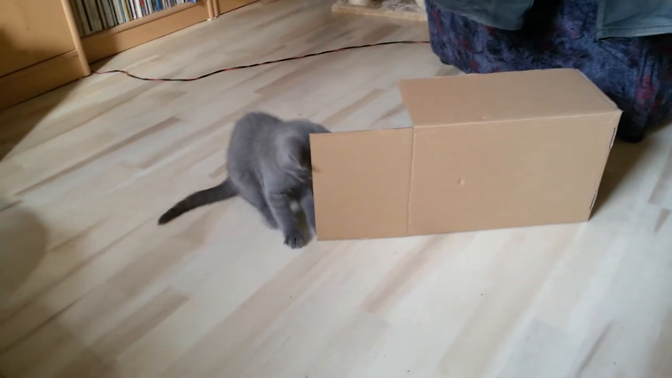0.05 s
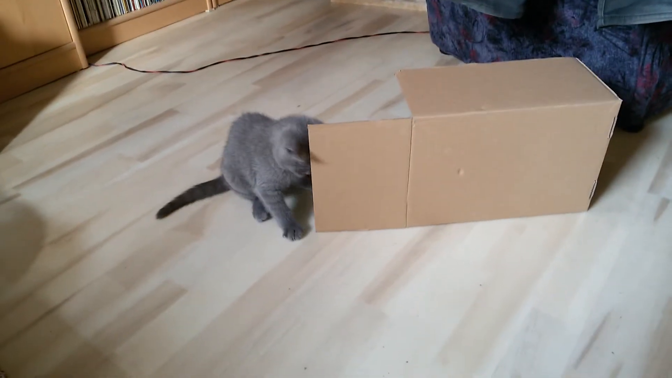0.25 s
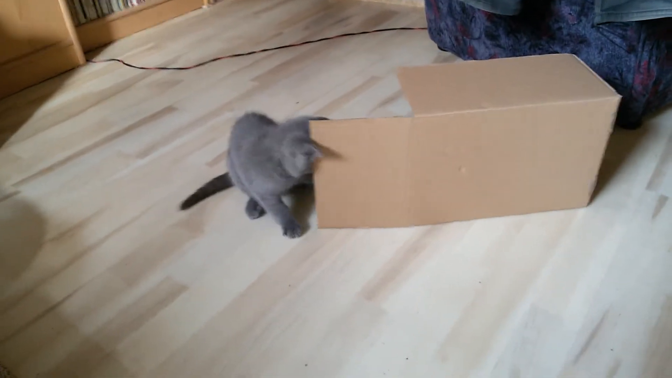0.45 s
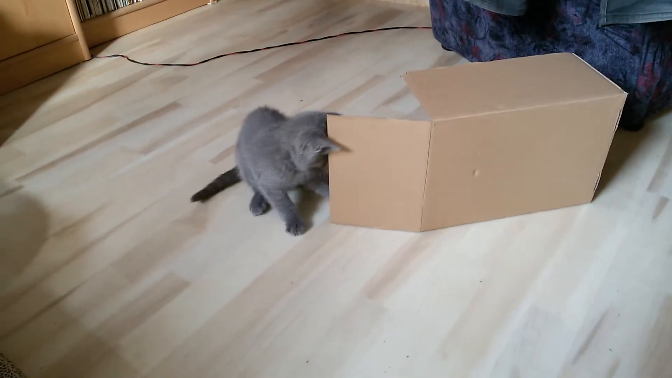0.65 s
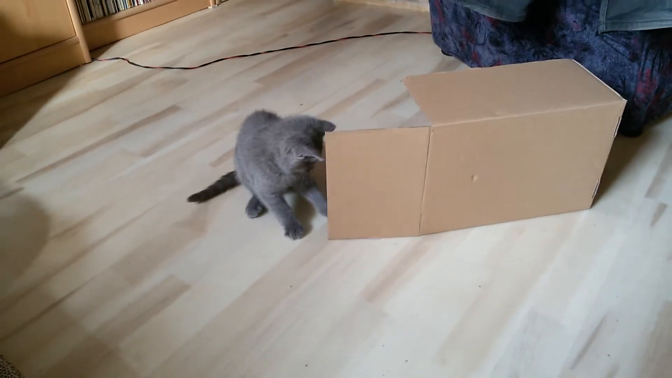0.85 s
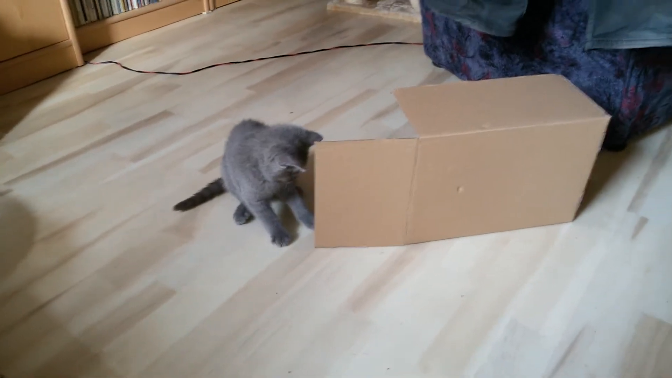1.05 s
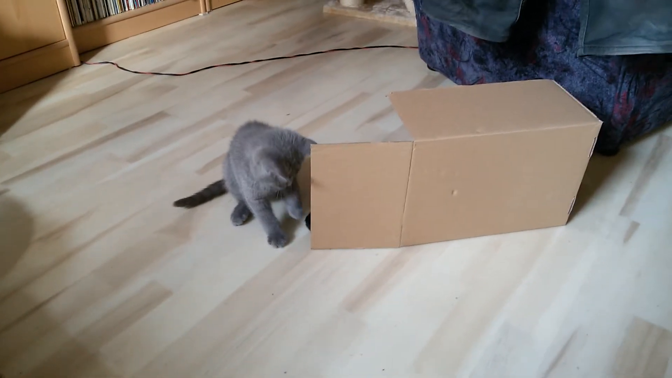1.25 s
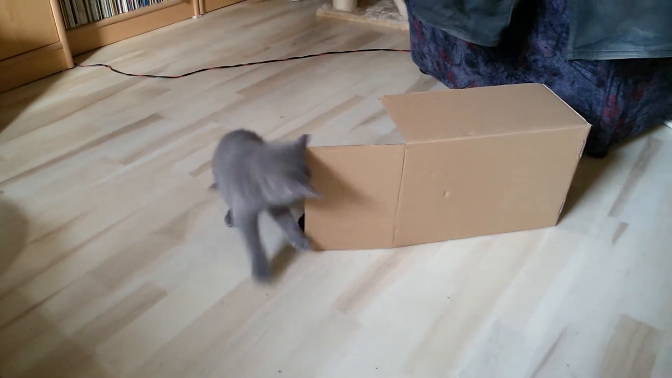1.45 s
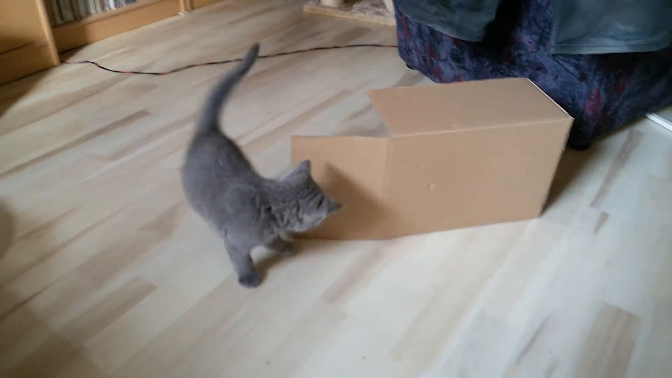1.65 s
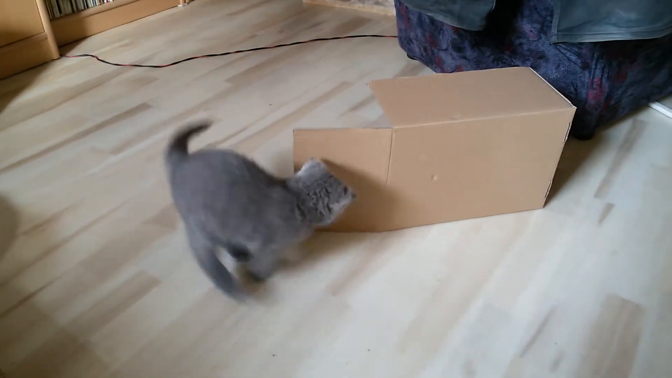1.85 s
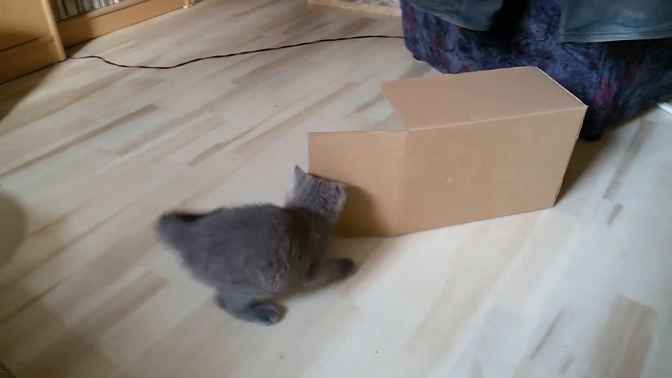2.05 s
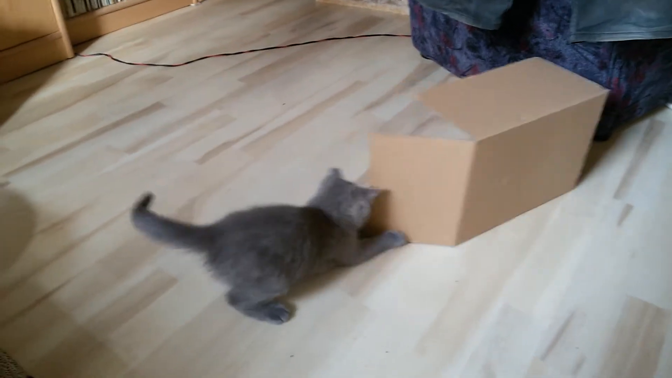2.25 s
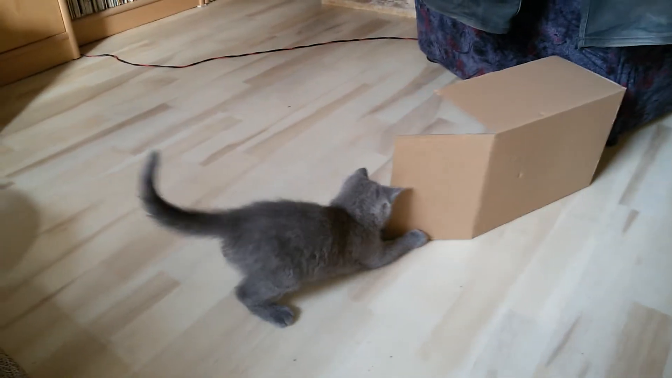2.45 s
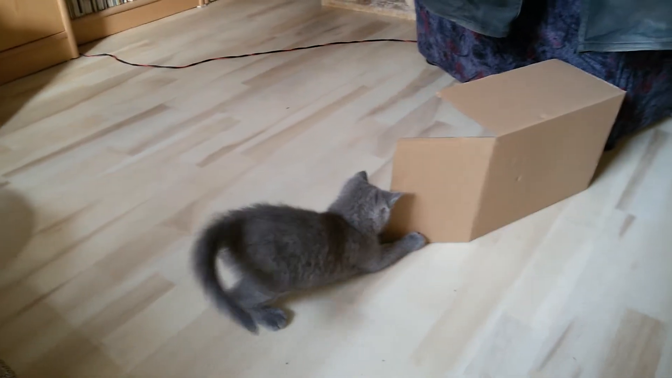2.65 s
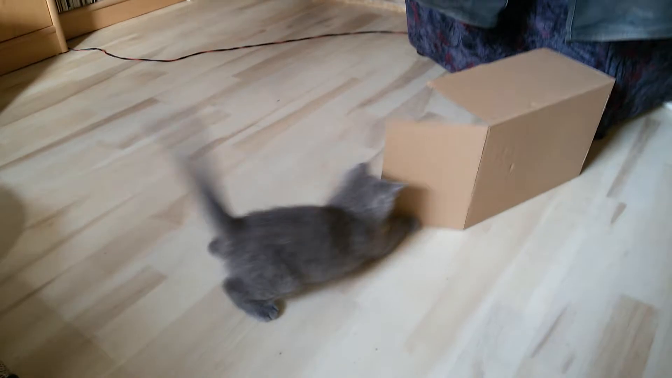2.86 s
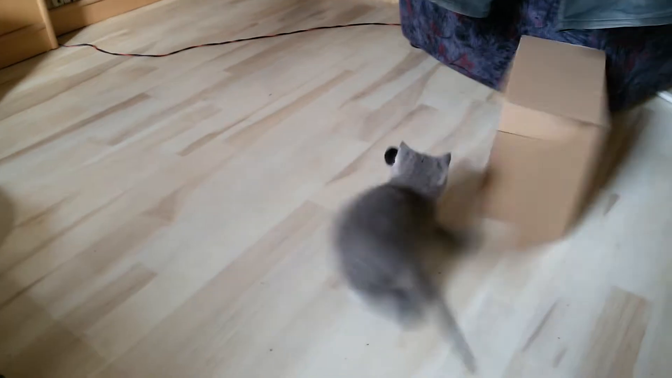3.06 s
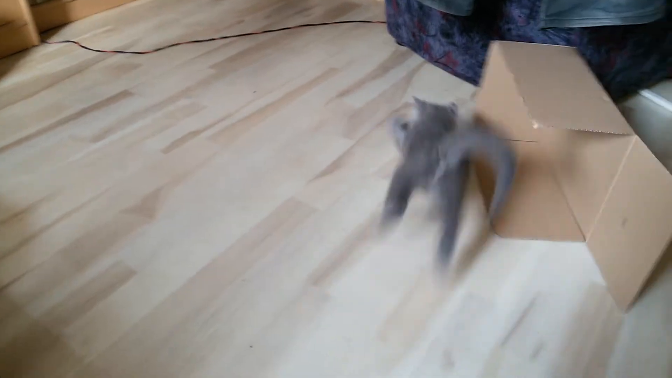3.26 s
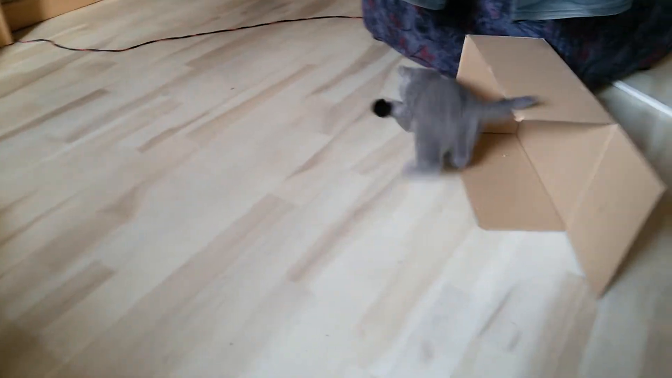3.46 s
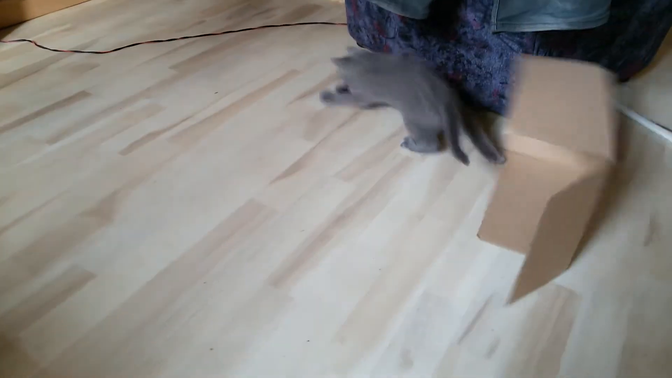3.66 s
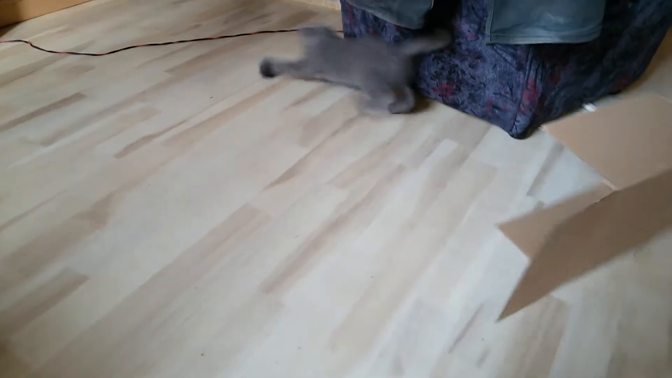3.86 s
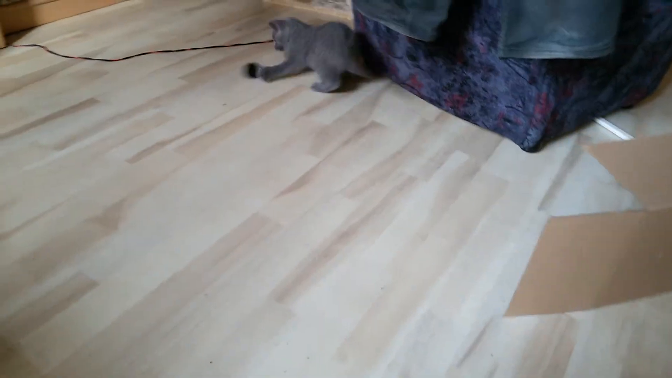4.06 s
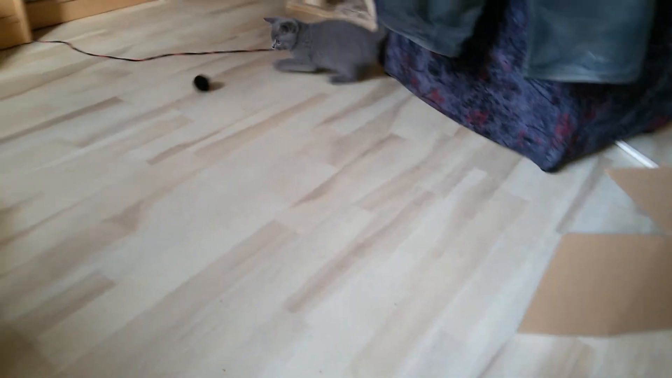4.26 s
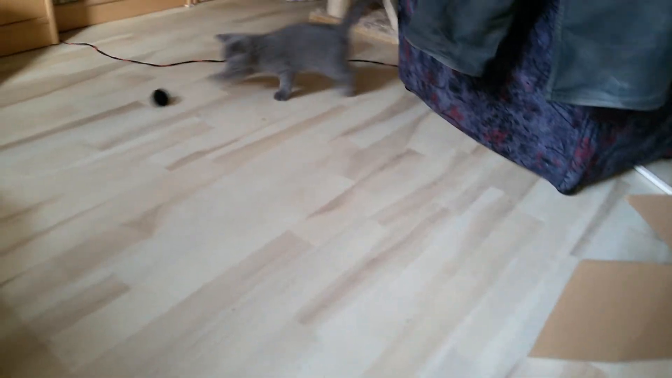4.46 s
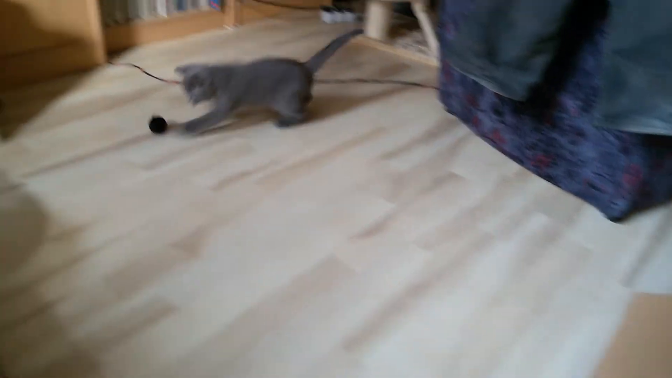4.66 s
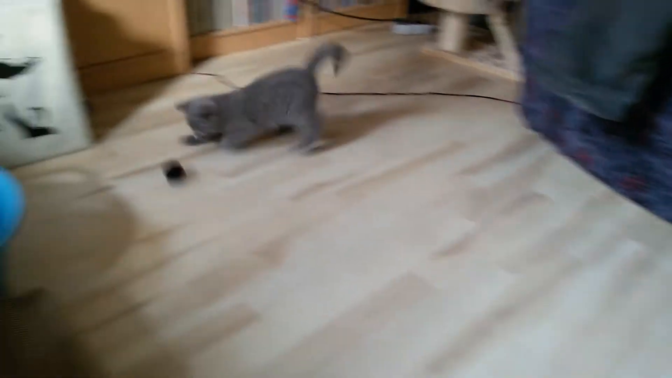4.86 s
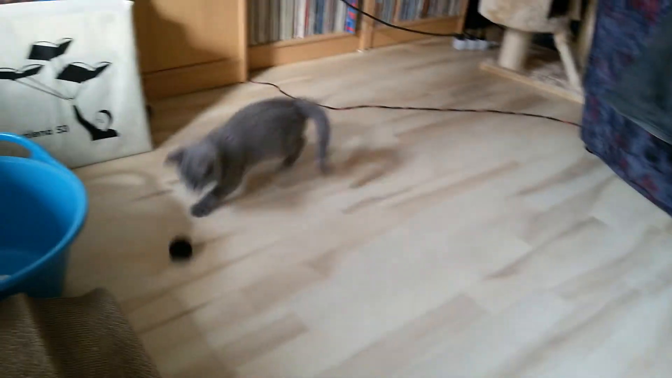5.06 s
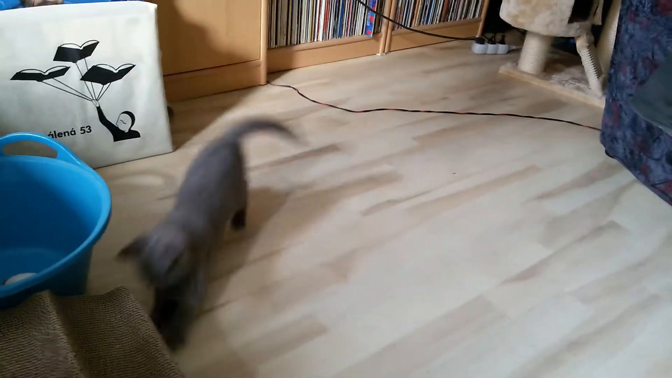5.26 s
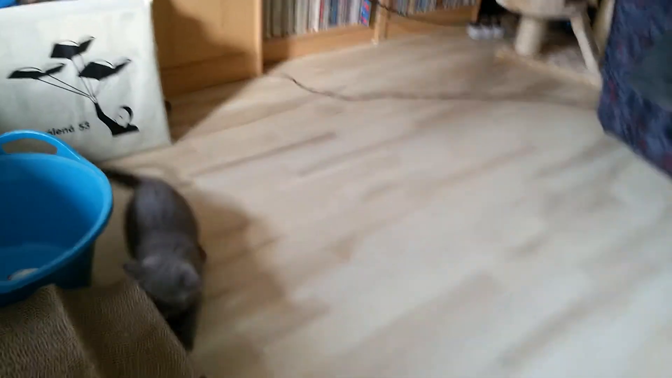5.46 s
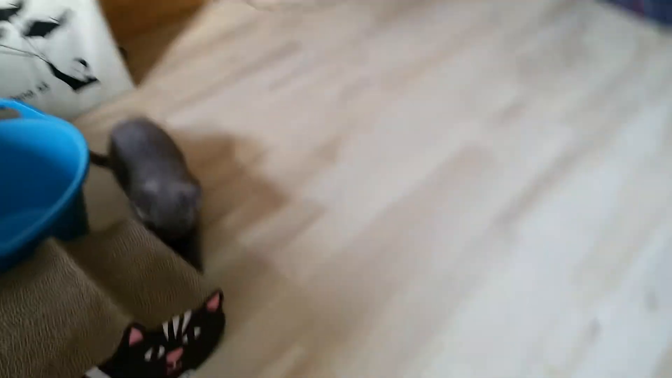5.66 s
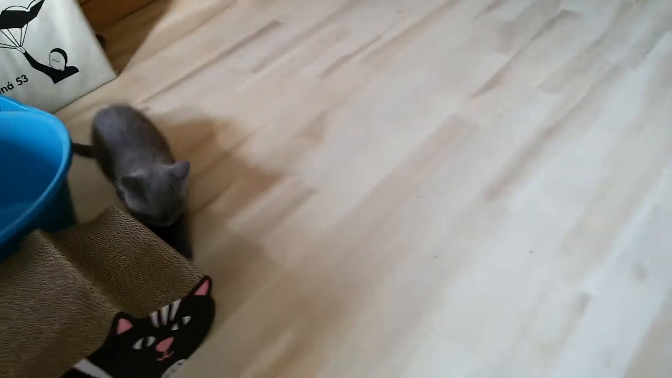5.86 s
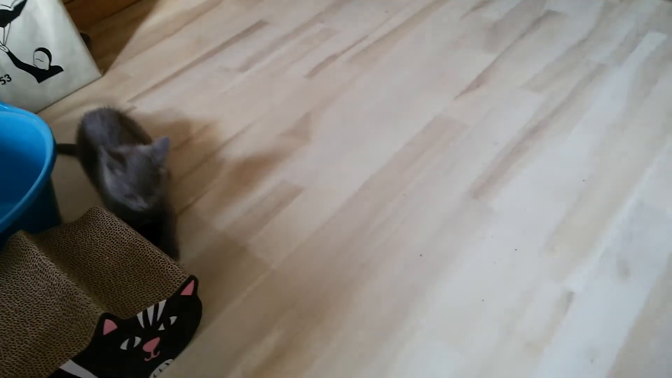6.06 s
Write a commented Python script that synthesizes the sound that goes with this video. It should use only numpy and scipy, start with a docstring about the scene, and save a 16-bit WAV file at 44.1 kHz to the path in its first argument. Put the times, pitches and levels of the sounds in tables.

```python
"""Paws and claws bat, shove and topple an empty cardboard box on a laminate floor; then a kitten chases a small toy.
Blows ring damped modes of the box panels and thin walls; claws tick as band-passed spikes with a scuff.
Edges and paws scrape as patchy noise with grit; unsteady noise drives the panels, boom and floor boards.
A furnished room answers with short echoes and a noise tail, over the soft hiss of a hand-held camera
and, faintly, a brief soft tone and a thin high ring."""
import sys
import numpy as np
from scipy import signal
from scipy.fft import rfft, irfft, next_fast_len
from scipy.io import wavfile
from scipy.ndimage import uniform_filter1d, map_coordinates

SR = 44100
rng = np.random.default_rng(int(sys.argv[2]) if len(sys.argv) > 2 else 0)


def to_wav(sig):
    """Store sig (one row per channel, or 1-D mono) as 16-bit WAV at the path in sys.argv[1].

    Samples outside -1..1 are clipped; the rate is SR.
    """
    pcm = np.clip(np.atleast_2d(sig), -1, 1) * 32767
    pcm = np.round(pcm).astype(np.int16)
    wavfile.write(sys.argv[1], SR, pcm.T)  # frames by channels


N = 269892

# Levels are those ahead of the microphone; spectrum and mode levels are relative.
# Background hiss spectrum: [f/Hz, level/dB]
HISS_SPECTRUM = [(12, -29), (20, -9.5), (30, 4), (97, -0.5), (640, -13.5), (1010, -16.5), (1450, -17.5),
                 (1760, -18.5), (1970, -20), (14800, -25)]
HISS_DB = -67.5  # rms
# Faint soft tone as the flap is brushed, before its wobble: [t/s, f/Hz, level/dB]
SOFT_TONE = [(1.55, 648, -71), (1.58, 644, -66), (1.60, 610, -64), (1.65, 595, -56.5), (1.70, 590, -92)]
# Thin high ring: [t/s, level/dB]
HIGH_RING = [(4.55, -90.5), (4.9, -80), (5.15, -79.5)]
HIGH_RING_HZ = 9430

# Decay of the furnished room: [f/Hz, t60/s]
ROOM_DECAY = [(100, 0.4), (500, 0.34), (2000, 0.37), (6000, 0.38), (14000, 0.66)]
# Strength of the room's answer: [f/Hz, level/dB]
ROOM_STRENGTH = [(60, -5.5), (130, -9.5), (250, -4), (1000, -2.5), (5000, -1), (14000, -3.5)]
# Echoes off floor, box and sofa: [delay/ms, level/dB]
FIRST_ECHOES = [(1.9, -12), (4.6, -12.5), (8.3, -13), (13, -18)]

# Box panels, three of the body then two of the flap: [f/Hz, level/dB, t60/s undamped]
PANEL_MODES = [(181.3, 0.5, 0.42), (334, -7, 0.55), (395.4, -17.5, 0.24), (203.8, 2.5, 0.28),
               (281.6, -6, 0.89)]
# Thin box walls: [f/Hz, level/dB, t60/s undamped]
WALL_MODES = [(523, -9.5, 0.11), (588, -1.5, 0.09), (654, -12.5, 0.057), (728, -5, 0.032), (971, 1, 0.056),
              (1063, 1, 0.061), (1215, -2.5, 0.073), (1288, -2, 0.074), (1420, -10.5, 0.061),
              (1644, -2, 0.055), (1770, -4, 0.064), (1864, 1, 0.067), (2030, -12, .06), (2700, -4.5, 0.034)]
# Largest panel and the air in the box: [f/Hz, level/dB, t60/s undamped]
BOOM_MODES = [(75, -12, 0.26), (111.16, 2, 0.8), (129, -13, 0.17)]

# Spectrum of the floor scrape: [f/Hz, level/dB]
SCRAPE_SPECTRUM = [(700, -29.5), (1300, 3), (2000, 6), (2900, 4.5), (4000, 6.5), (5500, 2.5), (7500, -10.5),
                   (11000, -38.5)]
# Spectrum of the fine sliding hiss: [f/Hz, level/dB]
FINE_SPECTRUM = [(4500, -29.5), (6500, 2.5), (9000, 6.5), (12000, 1), (14600, -3.5)]
# Spectrum of the floor-board rumble: [f/Hz, level/dB]
BOARD_SPECTRUM = [(45, -8.5), (90, -2), (250, -1), (500, -12), (900, -28)]
# Strokes of paws and box edges: [start t/s, rise/s, hold/s, scrape level/dB,
# cardboard rasp level/dB and fine hiss level/dB, both relative to the scrape]
SLIDE_STROKES = [(0, 0.0013, 0.0014, -34.5, -7.5, -7.5), (0.048, 0.0057, 0.14, -63, -5.5, -22),
                 (0.338, 0.067, 0.11, -67.5, -4, -4), (0.598, 0.017, 0.018, -63, -5, -3.5),
                 (.68, 0.012, 0.008, -62, -10, -1), (0.729, 0.0035, 0.11, -61.5, -7, -7.5),
                 (1.078, 0.021, 0.018, -71.5, -19, -9), (1.422, 0.15, 0.055, -71, 0.5, -2.5),
                 (1.892, 0.0076, 0.14, -70.5, 4, -1.5), (2.007, 0.0045, 0.081, -53.5, -10.5, -6),
                 (2.168, 0.084, 0.044, -46.5, -3.5, -3), (2.297, 0.014, 0.13, -51, -3, -9.5),
                 (2.764, 0.095, 0.12, -60, 3, -7.5), (3.005, 0.04, 0.038, -43.5, -6, -9),
                 (3.143, 0.0036, 0.021, -45, -6.5, -9.5), (3.205, 0.02, 0.016, -45, -9.5, -12.5),
                 (3.24, 0.0094, 0.012, -46, -13.5, -13), (3.312, 0.0035, 0.011, -46, -8, -8),
                 (3.345, 0.023, 0.15, -47, -8.5, -9.5), (3.602, .005, 0.061, -50, 2, -6.5),
                 (3.599, 0.11, 0.059, -36, -5, -5.5), (3.761, 0.013, 0.038, -38, -1.5, -6),
                 (3.842, 0.015, 0.085, -40.5, -3, -9.5), (3.944, 0.012, 0.03, -40.5, -7, -14),
                 (4.0, 0.016, 0.073, -46.5, -3, -6.5), (4.162, 0.0112, 0.079, -55.5, -12.5, -9),
                 (4.289, 0.03, 0.15, -63, -2, -4), (4.52, 0.016, 0.036, -63.5, -6.5, -5.5),
                 (4.738, 0.026, 0.035, -63, -8, -12), (4.812, 0.0054, 0.034, -46, -15, -3),
                 (4.9, 0.032, 0.025, -57.5, -6, 2.5), (5.021, 0.0044, 0.052, -55.5, -6, -11),
                 (5.271, 0.0068, 0.04, -55.5, -5.5, -2.5), (5.309, 0.025, 0.093, -52, -10.5, -12.5),
                 (5.395, 0.02, 0.026, -56, -1.5, -7), (5.53, 0.0146, 0.026, -66, -4.5, -7.5)]
RISE_DB, FADE_DB_PER_S = 14.5, 147.5  # growth from start to hold; fade as the contact lifts
DRUM_DB, BOOM_DB, BOARDS_DB = -4.5, -17, -0.5  # drumming, boom and floor rumble relative to the rasp
BOX_LEFT_S = 5.3  # the kitten runs off: sliding no longer drums or booms the box
# The flap's edge sings as the kitten rubs it: [middle t/s, half-length/s, level/dB]
FLAP_SQUEAKS = [(0.123, 0.034, -56), (0.181, 0.013, -56.5), (0.51, 0.042, -71)]

# Claw and edge ticks: [t/s, snap peak level/dB, centre f/Hz, skid level/dB against the noise burst,
# bright edge level/dB of the unfiltered burst]
CLAW_TICKS = [(0.0783, -33, 1680, -2, -30), (0.0825, -29, 2500, -12, -14), (0.1217, -30.5, 1960, -14, -24),
              (0.172, -45, 1920, -11, -27), (0.6246, -44, 1690, 6, -12), (0.7326, -33, 2130, -2.5, -21.5),
              (2.0121, -35, 4200, -14, -25.5), (2.0695, -36.5, 3400, 0, -32.5),
              (2.2277, -14, 2020, -13, -29), (2.2297, -13, 1920, -6.5, -32), (3.032, -36, 4150, -7, -30),
              (3.1469, -28, 3540, -17, -20.5), (3.175, -50, 1510, -15, -28), (3.213, -35, 1950, -8, -28),
              (3.2475, -44, 1830, -11.5, -30), (3.250, -28.5, 5300, -11, -24.5),
              (3.3155, -35.5, 1900, -4, -29), (3.3648, -23.5, 4000, -14, -21), (3.369, -31, 3500, -13, -25),
              (3.4315, -13.5, 1335, -2.5, -24.5), (3.4329, -10.5, 3120, -1, -15.5),
              (3.4358, -13, 1100, -17, -36), (3.604, -28, 4360, -10, -24), (3.7789, -17, 1690, -16, -12),
              (3.7929, -22, 1690, -7.5, -21.5), (3.8653, -36, 2480, -21.5, -18.5),
              (3.9575, -20, 3860, -8, -30.5), (3.9635, -15.5, 3600, -28, -27),
              (4.013, -22.5, 4040, -16, -31), (4.059, -27.5, 7080, -16, -17), (4.3025, -39, 1410, -9, -25),
              (4.803, -48, 2260, -8, -32.5), (4.8168, -25, 3560, -3.5, -16.5),
              (4.826, -30.5, 3480, -3, -24.5), (4.852, -42, 3500, -7, -20), (4.931, -36, 3820, -18, -25.5),
              (4.9572, -31.5, 4500, -8, -24), (5.0242, -39.5, 3040, -1, -14), (5.0615, -38, 3700, -9, -22),
              (5.078, -41.5, 1505, -5, -20), (5.2756, -41, 2476, -11, -26), (5.305, -40, 3180, -11, -21.5),
              (5.3165, -35, 2970, -9, -23), (5.3382, -30, 3130, -23, -23.5),
              (5.3500, -36.5, 1300, -11.5, -21.5), (5.3516, -31.5, 3030, -17.5, -27.5),
              (5.4435, -40, 2440, -15, -18)]
TICK_RING = 0.47  # starting amplitude of the ring against the snap's peak

# Blows on box and floor: [t/s, thud level/dB, boom level/dB, slap level/dB, hardness f/Hz,
# swell/ms (before a small minimum is added), ring length (1 = undamped), flap share 0-1]
BLOWS = [(0.001, -68, -72, -40, 2250, 1.7, 0.8, 0.3), (1.461, -51.5, -75, -73, 694, 5.1, 0.6, 0),
         (1.564, -55.5, -81, -58, 900, 6.9, 0.8, 0.9), (1.903, -22.5, -38, -35.5, 486, 5.3, 0.58, 0.6),
         (2.019, -38, -40.5, -52, 900, 1.5, 0.45, 0.26), (2.2277, -16.5, -26, -27, 1600, 4.1, 0.6, 0.3),
         (2.231, -26, -36, -21.5, 620, 1.9, 0.56, 0.3), (2.852, -53, -70, -41.5, 1100, 14, 1, 0.2),
         (2.877, -37.5, -62, -41, 700, 0.92, 0.37, 0.6), (3.029, -58, -70, -39.5, 1100, 12, 1, 0.41),
         (3.058, -50.5, -59.5, -43.5, 620, 2.4, 1, 0.9), (3.076, -21.5, -48, -49, 593, 14, 0.4, 0.86),
         (3.1467, -26.5, -31.5, -44, 500, 0.66, 0.29, 0.1), (3.278, -35, -44.5, -57.5, 718, 2.2, 0.6, 0.3),
         (3.431, -16, -18.5, -19.5, 1140, 1.17, 0.92, 0.1), (3.472, -20, -21.5, -32, 990, 3.9, 0.6, 0.05),
         (3.750, -16, -24, -33.5, 620, 1.5, 0.47, 0.2), (3.790, -21, -28, -45, 900, 12, 0.68, 0.38),
         (3.845, -22, -22.5, -43, 900, 24, 0.82, 0.12), (4.08, -24, -49, -54.5, 700, 11, 0.41, 1),
         (4.264, -39.5, -64, -47, 600, 12, 0.9, 0.68), (4.302, -13, -25, -21.5, 580, 2.6, 0.49, 0.7),
         (4.812, -53, -70, -46, 937, 1.5, 0.37, 0.1), (5.411, -55.5, -55, -41, 480, 6.6, 0.76, 0.52),
         (5.462, -47, -54, -39.5, 400, 8, 0.69, 0.51)]
SLAP_SOFTNESS = 0.4  # exponent on the swell: a slap rises like the thud, only faster

# The camera's band limit
TOP_HZ = 14750


def amp(db):
    """Gain of a dB value."""
    return 10 ** (np.asarray(db) / 20)


def unit(x):
    """Scaled to rms 1."""
    return x / np.sqrt(np.mean(x ** 2) + 1e-20)


def along(points, hz):
    """Value at hz, interpolated between (Hz, value) points on a log axis."""
    f, v = np.transpose(points)
    return np.interp(np.log(hz + 1), np.log(f + 1), v)


def wobble(rate):
    """A smooth random curve, rate knots a second."""
    return map_coordinates(rng.standard_normal(int(N * rate / SR) + 4), [np.arange(N) * rate / SR])


def filtered(x, response):
    """x shaped by a complex response of frequency."""
    m = next_fast_len(N + SR // 2)
    return irfft(rfft(x, m) * response(np.fft.rfftfreq(m, 1 / SR)), m)[:N]


def shaped(x, spectrum):
    """x shaped by a table of levels over frequency."""
    return filtered(x, lambda f: amp(along(spectrum, f)))


def resonances(modes, wider):
    """Causal response of modes with alternating sign, each widened by a factor."""
    def response(f):
        total = 0
        for k, (centre, db, t60) in enumerate(modes):
            width = 1j * f * wider / t60
            total = total + (-1) ** k * amp(db) * width / (centre * centre - f * f + width)
        return total
    return response


def patchy(patchy_db):
    """White noise with random patches of gain in time and frequency."""
    z = signal.stft(rng.standard_normal(N), nperseg=256)[2]
    field = uniform_filter1d(rng.standard_normal(z.shape), size=6, axis=0)
    field = uniform_filter1d(field, size=8, axis=1)
    return signal.istft(z * amp(patchy_db * unit(field)), nperseg=256)[1][:N]


def hiss():
    """The quiet room and the microphone's own noise: slightly patchy, shaped noise."""
    return amp(HISS_DB) * unit(shaped(patchy(patchy_db=-0.24), HISS_SPECTRUM))


def soft_tone():
    """A short, hoarse low sine, unsteady in level and pitch as the flap is brushed."""
    s, hz, db = np.transpose(SOFT_TONE)
    t = np.arange(N) / SR
    level = amp(np.interp(t, s, db, -120, -120) + 3.0 * wobble(70))
    pitch = np.interp(t, s, hz) * (1 + 0.02 * wobble(60))
    return level * np.sin(2 * np.pi * np.cumsum(pitch) / SR)


def high_ring():
    """A thin, unsteady high ring: noise in a very narrow band."""
    t = np.arange(N) / SR
    narrow = filtered(rng.standard_normal(N), lambda f: np.exp(-((f - HIGH_RING_HZ) / 45) ** 2))
    return amp(np.interp(t, *np.transpose(HIGH_RING), -120, -120)) * unit(narrow)


def room(x):
    """Noise tail of the room, each frequency dying at its own speed; new every third of a second."""
    out, step = np.zeros(N + 2 * SR), SR // 3
    for start in range(0, N, step):
        hz, t, z = signal.stft(rng.standard_normal(SR * 3 // 5), SR, nperseg=256)
        decay = amp(-60 * t / along(ROOM_DECAY, hz)[:, None])
        tail = signal.istft(z * decay, SR, nperseg=256)[1]
        wet = signal.fftconvolve(x[start:start + step], tail / np.linalg.norm(tail))
        out[start + 130:][:len(wet)] += wet  # about 3 ms behind the direct sound
    return out[:N]


def echoes(x):
    """The direct sound and its delayed, weaker first reflections."""
    reflected = sum(amp(db) * np.pad(x, (round(ms * SR / 1000), 0))[:N] for ms, db in FIRST_ECHOES)
    return x + reflected


def strokes():
    """Levels of scrape, rasp and fine hiss: the powers of overlapping strokes add up."""
    t = np.arange(0, N + 64, 64) / SR
    s, rise, hold, db, rasp_db, fine_db = np.transpose(SLIDE_STROKES)[:, :, None]
    age = t - s
    growth_db = RISE_DB * np.minimum(age / np.maximum(rise, .001) - 1, 0)
    fade_db = FADE_DB_PER_S * np.maximum(age - rise - np.abs(hold), 0)
    stroke_db = growth_db - fade_db + db
    levels = [np.sqrt(np.sum(amp(stroke_db + above_db) ** 2, axis=0)) for above_db in (0, rasp_db, fine_db)]
    return [np.interp(np.arange(N) / SR, t, level) for level in levels]


def squeaks(rub):
    """Rubbing excites one wall mode of the flap's edge in brief swells."""
    t = np.arange(N) / SR
    level = sum(amp(db) * np.exp(-((t - s) / half) ** 2) for s, half, db in FLAP_SQUEAKS)
    return level * unit(filtered(rub, resonances(WALL_MODES[11:12], wider=9.0)))


def sliding():
    """Patchy noise with grit drives scrape, fine hiss and rasp; unsteady noise drives panels, boom and boards."""
    on_floor, on_box, hissing = strokes()
    # single slips, on average 500 a second
    slips = rng.random(N) < 500 / SR
    grit = slips * amp(3.0 * np.minimum(rng.exponential(size=N), 1.8)) * rng.standard_normal(N)
    unsteady = amp(2.2 * wobble(35) + 1.2 * wobble(150))
    rub = unsteady * (patchy(patchy_db=2.5) + 0.52 * unit(grit))
    scrape = unit(shaped(rub, SCRAPE_SPECTRUM))
    fine = unit(shaped(patchy(patchy_db=4.0) + 2.1 * rub, FINE_SPECTRUM))
    rasp = unit(filtered(rub, resonances(WALL_MODES[:9], wider=9.6)))

    shake = amp(4 * wobble(25)) * rng.standard_normal(N)
    drum = unit(filtered(shake, resonances(sorted(PANEL_MODES), wider=1.6)))
    boom = filtered(shake, resonances(BOOM_MODES, wider=8.3))
    boom = unit(filtered(boom, resonances(BOOM_MODES[1:2], wider=68.0)))
    boards = unit(shaped(shake, BOARD_SPECTRUM))
    at_box = np.arange(N) < BOX_LEFT_S * SR
    body = at_box * (amp(DRUM_DB) * drum + amp(BOOM_DB) * boom)
    box_and_boards = rasp + body + amp(BOARDS_DB) * boards
    return on_floor * scrape + squeaks(rub) + hissing * fine + on_box * box_and_boards


def ticks():
    """A claw tip or edge snaps and skids: a spike and a short scuff around a centre, where it rings on."""
    out, t = np.zeros(N + SR), np.arange(SR // 12) / SR
    spike = t == 0
    for s, db, hz, skid_db, edge_db in CLAW_TICKS:
        scuff = 0.3 * amp(-60 * t / 0.0041) + amp(skid_db - 60 * t / 0.093)
        burst = scuff * rng.standard_normal(len(t)) + 8 * spike
        band = signal.butter(2, [hz / 1.9, min(hz * 1.8, SR / 2.2)], "band", fs=SR, output="sos")
        snap = signal.sosfilt(band, burst) + amp(edge_db) * (burst + 9 * spike)
        decay = amp(-60 * t * hz / 30)  # falls 60 dB in 30 cycles
        ring = TICK_RING * decay * np.sin(2 * np.pi * hz * t)
        out[round(s * SR):][:len(t)] += amp(db) * (snap / np.abs(snap).max() + ring)
    return out[:N]


def ringing(modes, t, spread_db, detune, roughness):
    """Mode strengths and pitches vary at random from blow to blow; a wandering phase roughens the ring."""
    luck = rng.standard_normal((len(modes), 2))
    wander = roughness * np.cumsum(rng.standard_normal((len(modes), len(t))), axis=1) / np.sqrt(SR)
    total = 0
    for (hz, db, t60), (strength, shift), phase in zip(modes, luck, wander):
        level = amp(db + spread_db * strength - 60 * t / t60)
        total = total + level * np.sin(2 * np.pi * hz * (1 + detune * shift) * t + phase)
    return total


def knocks():
    """A blow rings panels and walls; a soft contact dulls the slap, a paw left on the box shortens the ring."""
    out, t = np.zeros(N + SR), np.arange(SR // 2) / SR
    for s, thud_db, boom_db, slap_db, hard_hz, swell_ms, length, flap in BLOWS:
        swell = (1 - np.exp(-1000 * t / (abs(swell_ms) + 0.092))) ** 2
        extra_loss = np.clip(1 / np.clip(length, .1, 1.5) - 1, -.3, 9)
        damped = amp(-60 * t * extra_loss / 0.21)

        flap = np.clip(flap, 0, 1)
        panels = (1 - flap) * ringing(PANEL_MODES[:3], t, spread_db=2.0, detune=0.006, roughness=1.3)
        panels += flap * ringing(PANEL_MODES[3:], t, spread_db=2.4, detune=0.01, roughness=2.0)
        boom = ringing(BOOM_MODES, t, spread_db=4.5, detune=0.0034, roughness=1.5)
        thud = amp(thud_db) * panels + amp(boom_db) * boom

        walls = ringing(WALL_MODES, t, spread_db=1.0, detune=0.0092, roughness=24.0)
        rattle = 6.14 * amp(-60 * t / 0.037) * rng.standard_normal(len(t))  # loose flaps buzz
        crack = (1 - t / 0.0021) * np.exp(-t / 0.00053)
        # strongest near the contact's hardness
        edges = np.clip([hard_hz / 2.28, hard_hz * 1.09], 100, 9000)
        contact = signal.butter(2, edges, "band", fs=SR, output="sos")
        slap = signal.sosfilt(contact, walls + rattle + crack) * swell ** SLAP_SOFTNESS
        out[round(s * SR):][:len(t)] += damped * (swell * thud + amp(slap_db) * slap)
    # a light box radiates no deep bass
    return filtered(out[:N], lambda f: (1j * f / (42 + 1j * f)) ** 2)


def scene():
    """All sources in the room: blows excite it more than ticks, and ticks more than steady scraping."""
    blows, claws = knocks(), ticks()
    rubs = sliding() + soft_tone() + high_ring()
    tail = room(amp(3.5) * blows + amp(-2.0) * claws + amp(-8.0) * rubs)
    wet = shaped(tail, ROOM_STRENGTH)
    return (echoes(blows) + claws + rubs + wet + hiss())[None]


def record(dry):
    """The camera loses the deepest bass and keeps nothing above its band limit."""
    return filtered(dry[0], lambda f: (f < TOP_HZ) * (1j * f / (40 + 1j * f)) ** 2)[None]


dry = scene()
out = record(dry)
to_wav(out)
```